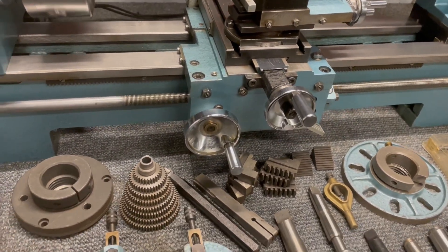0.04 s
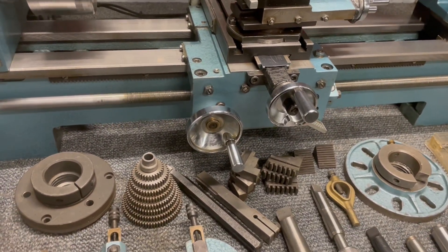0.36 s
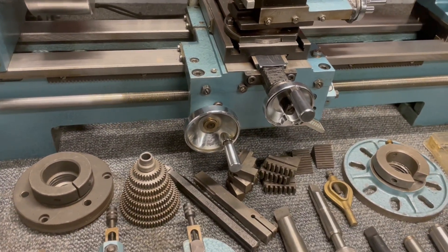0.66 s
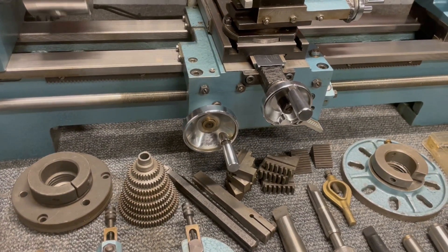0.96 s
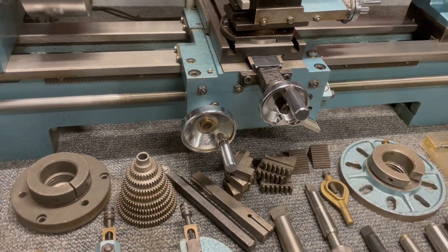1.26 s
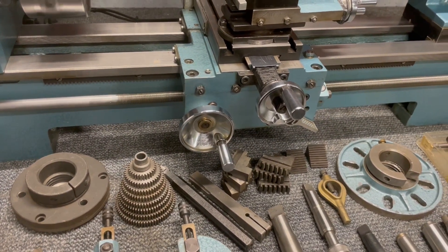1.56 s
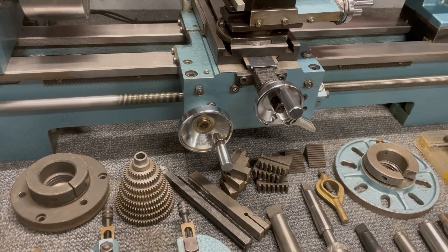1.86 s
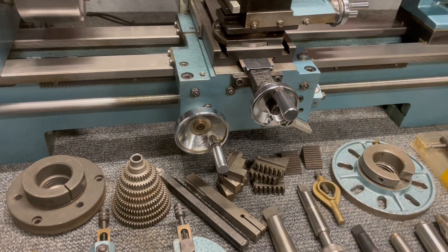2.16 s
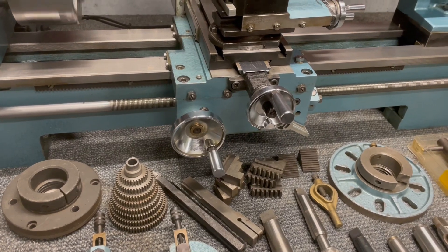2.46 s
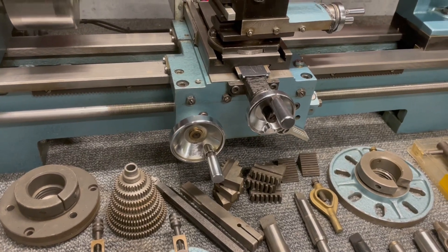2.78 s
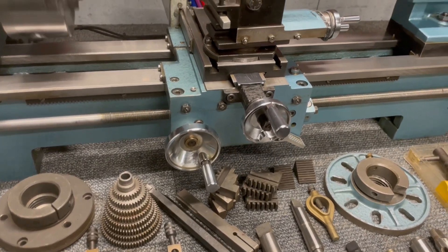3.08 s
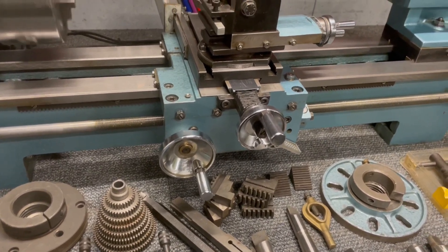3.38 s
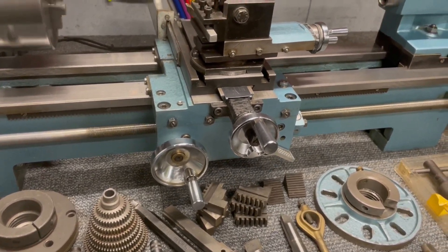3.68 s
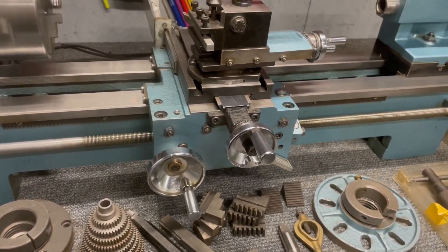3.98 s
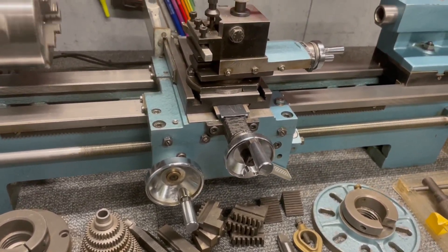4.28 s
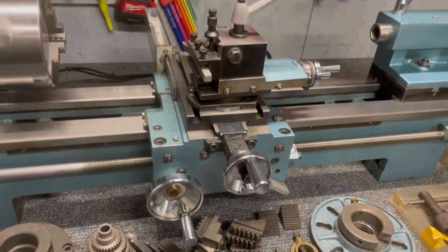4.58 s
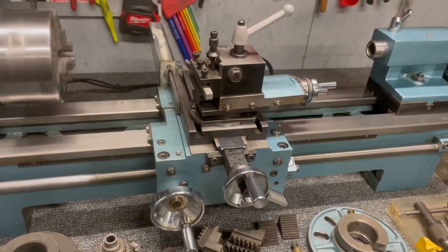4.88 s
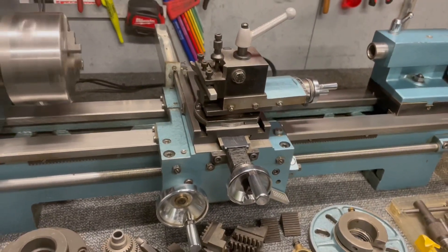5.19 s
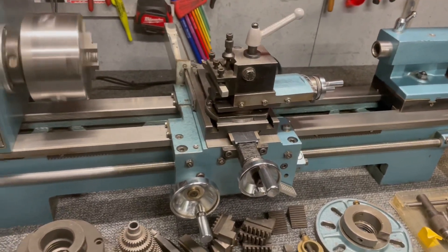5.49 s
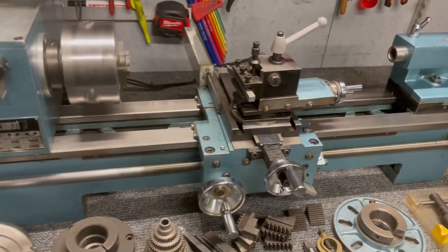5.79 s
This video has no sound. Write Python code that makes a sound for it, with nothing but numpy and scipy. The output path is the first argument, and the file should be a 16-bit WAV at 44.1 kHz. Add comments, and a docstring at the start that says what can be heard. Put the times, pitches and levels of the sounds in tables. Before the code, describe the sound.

A small metal lathe runs idle throughout in a workshop. Its motor hums while the gears give a fast, throbbing growl, a whine and a light rattle. Loose gear teeth knock irregularly, several times a second, over a faint belt hiss and a thin, high whistle. In the second half the bearings sing a little louder, with a few faint squeals near the end. The microphone is close and hand-held.

```python
"""A workshop, close to a small idling metal lathe; a hand-held microphone above the carriage turns
towards the chuck. Behind, the belt swishes, the drive electronics whistle thinly, the motor hums at
twice the mains rate and the bearings sing. In front, the headstock gears growl and whine, throb with
their shaft and ring the casting, now and then knocking through their backlash."""
import sys
import numpy as np
from scipy import signal
from scipy.fft import rfft, irfft
from scipy.io import wavfile

SR = 44100
rng = np.random.default_rng(int(sys.argv[2]) if len(sys.argv) > 2 else 0)


def inscribe(sig):
    """Save sig as 16-bit PCM at rate SR to the path in sys.argv[1].

    A 1-D sig is mono; a 2-D sig holds one channel per row.
    Samples are clipped to [-1, 1] before scaling.
    """
    pcm = np.round(np.clip(np.atleast_2d(sig).T, -1, 1) * 32767)
    wavfile.write(sys.argv[1], SR, pcm.astype(np.int16))


N = 257544

TIME = np.arange(N) / SR
FREQ = np.arange(N // 2 + 1) * SR / N + 1e-3
SIDES = np.array([[1], [-1]])  # left, right

RIPPLE_HZ, SHAFT_HZ = 99.965, 12.1935  # the motor's torque ripple, turns of the gear shaft
SPINDLE_HZ = SHAFT_HZ / 5
CHATTER_S = .005  # time over which a clash of teeth dies down

# Hum and gear tones. Each row: multiple of the spindle rate, multiple of the torque ripple (the two add
# up to the pitch), relative level in dB, left minus right in dB, left phase lead in radians.
TONES = [(0, 1, -31.9, -0.9, -0.2), (0, 2, -36.5, -2.6, -0.1), (0, 3, -46.5, -1.5, 0.2),
         (-5, 1, -53.1, -2.4, -0.1), (5, 2, -45.4, -4.2, 0.0), (108, 0, -48.5, -4.6, -0.3),
         (118, 0, -49, -3.3, -0.0), (134, 0, -47.8, -0.4, 0.6), (139, 0, -46.4, -4.6, 0.5),
         (144, 0, -45.0, -2.0, 0.4), (154, 0, -48.2, -3.8, 0.5), (170, 0, -48.0, -2.1, 1.0),
         (180, 0, -45.5, -4.7, -0.4), (185, 0, -47.9, -5.8, -0.1), (180, 1, -48.4, -6.1, 0.3),
         (280, 0, -47.5, 6.5, 1.8), (360, 0, -39.4, 3.5, 0.9), (355, 1, -49.3, -1.1, 0.7),
         (360, 1, -41.7, 11.3, 1.5), (365, 1, -48, 2.8, 1.7), (360, 2, -54.9, 5.1, 2.1),
         (497, 0, -52, 0, 1.5), (519, 0, -55, 0, 1.5), (540, 0, -53, 0, 1.5), (586, 0, -55, 0, 1.5),
         (620, 0, -53, 0, 1.5), (799, 0, -57.5, 0, 1.5), (555, 0, -51.1, -0.4, 1.6),
         (560, 0, -46.3, -1.4, 1.4), (560, 1, -54.5, 3.4, 0.0), (720, 0, -50.2, -0.3, 2.3),
         (840, 1, -56.6, -0.1, -1.1)]
# How the machine carries as the microphone moves. Each row: time in seconds, then rumble, mesh and
# rattle gains in dB.
CARRY = [(0, -.7, .3, -.5), (.8, .4, 0, -.2), (1.6, -.3, .2, -.5), (2.1, .1, -.2, -.7),
         (2.55, .9, -.5, -.9), (3.0, -.3, -.3, -.8), (3.8, 0, .1, .3), (4.5, -.2, 1, .9),
         (5.2, -1.5, 1.9, 1), (5.84, -1.6, 2.3, .5)]
# Hard backlash knocks. Each row: start in seconds, relative level in dB, rebound against the knock in dB.
KNOCKS = [(.011, -30.5, -10), (.262, -32, -12), (.411, -26, -7), (.510, -32.5, -10), (.911, -27.5, -7),
          (.991, -28, -4), (1.242, -31, -12), (1.650, -28, -10), (1.732, -29, -10), (1.812, -29.5, -12),
          (2.061, -28.5, -12), (2.142, -31, -12), (2.221, -27, -12), (2.442, -35, -1), (2.712, -27.5, -4),
          (2.791, -29.5, -12), (3.042, -29.5, -12), (3.372, -27, -12), (3.532, -26.5, -3),
          (3.861, -27, -12), (4.083, -33.5, -12), (4.103, -32, -12), (4.112, -27.5, -10), (4.191, -29, -8),
          (4.272, -24, -12), (4.443, -32, -10), (4.523, -29, -10), (4.601, -30.5, -6), (4.682, -25.7, -10),
          (4.936, -31, -10), (5.092, -25.5, -7), (5.413, -29.5, -10), (5.502, -26.5, -12)]


def undb(db):
    """Decibels to gain."""
    return 10 ** (np.asarray(db) / 20)


def curve(table, column=1):
    """One column of a time table at every sample."""
    table = np.array(table)
    return np.interp(TIME, table[:, 0], table[:, column])


def colour(table, column=1):
    """One column of a spectrum table at every frequency."""
    table = np.array(table)
    return np.interp(np.log(FREQ), np.log(table[:, 0]), table[:, column])


def wave(hz, peak_turns):
    """A cosine that peaks at the given share of its cycle."""
    return np.cos(2 * np.pi * (hz * TIME - peak_turns))


def walk(rate_hz):
    """Smooth random wander with a spread near 1."""
    count = int(N / SR * rate_hz) + 2
    knots = signal.resample(rng.standard_normal(count), 8 * count)
    return np.interp(TIME * rate_hz * 8, np.arange(len(knots)), knots / knots.std())


def above(hz):
    """Power response of a steep high-pass."""
    return 1 / (1 + (hz / FREQ) ** 6)


def resonance(hz, width):
    """Power response of a steep resonance."""
    return 1 / (1 + ((FREQ / hz - hz / FREQ) * hz / width) ** 2) ** 2


def room(t60):
    """Frequency response of the workshop's diffuse echoes, unit energy."""
    age = TIME[:SR // 2]
    tail = rng.standard_normal(len(age)) * undb(-60 * age / t60)
    return rfft(tail / np.linalg.norm(tail), N)


def ring(force, modes, spread):
    """Steel parts ring with a force; nearby surfaces scatter the sound differently to left and right."""
    gain = np.sqrt(sum(resonance(hz, width) * undb(db) ** 2 for hz, width, db in modes))
    paths = (1 + SIDES * spread * room(t60=.02)) / np.hypot(1, spread)
    return irfft(rfft(force) * paths * gain / np.sqrt(np.mean(gain ** 2)), N)


def placed_tone(phase, db, pan_db, lead=0):
    """A stereo tone, louder on the left by pan_db and ahead there by lead radians."""
    return np.sqrt(2) * undb(db + SIDES * pan_db / 2) * np.cos(phase + SIDES * lead / 2)


def belt(bounce=.4):
    """Hiss swells on each lap of the belt, bounces off the bed and reaches the two sides out of step."""
    # Belt and fan hiss. Each row: frequency in Hz, direct density in relative dB, left phase lead in
    # radians, scattered density in relative dB.
    belt_hiss = [(3500, -105, 1.5, -100), (4500, -95, 1.5, -85), (5300, -91, 1.5, -87),
                 (5750, -89, 3.2, -88), (6300, -83.5, 5.0, -86), (7000, -83.3, 5.0, -86),
                 (7600, -83, 3.5, -96), (8200, -82, 3.2, -104), (9000, -80, 2.7, -100),
                 (10000, -80, 2.1, -96), (11000, -82.7, 1.6, -100), (12000, -87.8, .9, -104),
                 (13000, -95.5, .2, -110), (15000, -118, 0, -128)]
    lap_hz = 9.24
    laps = wave(lap_hz, .8) + .5 * wave(2 * lap_hz, .3)
    swish = undb(1.3 * laps + .4 * wave(SHAFT_HZ, .31) + 1.3 * walk(29.73))
    direct = rfft(rng.standard_normal(N) * swish) * np.exp(1j * SIDES * colour(belt_hiss, column=2) / 2)
    near = direct * undb(colour(belt_hiss)) * (1 + bounce * room(t60=.06)) / np.hypot(1, bounce)
    scattered = rfft(rng.standard_normal((2, N)) * swish) * undb(colour(belt_hiss, column=3) - 1)
    return irfft(near + scattered, N) * np.sqrt(SR / 2) * undb(-1.1)


def whistle(switching_hz=15641.3):
    """The switching tone of the motor's drive electronics, trembling in level."""
    # Fades between standing waves. Each row: time in seconds, relative level in dB.
    whistle_fades = [(0.0, -63), (0.32, -60), (0.67, -77), (1.33, -58), (2.13, -64), (3.48, -54.5),
                     (3.82, -59), (4.77, -60), (4.85, -55), (5.41, -56), (5.53, -65), (5.61, -55),
                     (5.79, -68), (5.84, -56)]
    level = undb(curve(whistle_fades) + 4.5 + 1.3 * walk(35))
    phase = 2 * np.pi * switching_hz * TIME + .8 * walk(1.5)
    return np.sqrt(2) * level * np.cos(phase - SIDES * .38)


def motor_hum():
    """Steady magnetic hum at the torque ripple and its harmonics."""
    return sum(placed_tone(2 * np.pi * ripple * RIPPLE_HZ * TIME, db + .06, pan_db, lead)
               for spindle, ripple, db, pan_db, lead in TONES if spindle == 0)


def bearings():
    """Rolling balls keep the races ringing and a narrow gear whine rises towards the chuck, each mode swelling
    on its own; one race squeals in spurts."""
    # Narrow modes of races and thin covers, led by a narrow meshing whine near 1.37 kHz that grows # towards
    # the chuck. Each row: pitch in Hz, width in Hz, relative level in dB over the carriage, the # same towards
    # the chuck.
    race_modes = [(1367, 12, -56, -47), (1470, 200, -58, -45.5), (2350, 260, -53, -51),
                  (2660, 300, -54, -48), (2985, 90, -58, -48.5), (5023, 75, -69, -60),
                  (5146, 110, -62, -67), (5249, 55, -66, -61), (6272, 70, -72, -61.5),
                  (6590, 90, -70, -61.5), (6788, 50, -69, -62), (6990, 90, -62, -66)]
    # The microphone turns to the chuck. Each row: time in seconds, share of the turn from 0 to 1.
    microphone_turn = [(0, 0), (2.9, 0), (3.7, .6), (4.4, .95), (5.84, 1)]
    # Squeals, clearest near the chuck. Each row: centre in seconds, length in seconds, relative dB.
    squeals = [(5.03, .04, -54), (5.14, .04, -53), (5.435, .06, -47.5), (5.545, .035, -51.5),
               (5.585, .025, -54), (5.638, .045, -51), (5.77, .04, -51.5)]
    singing, turn = 0, curve(microphone_turn)
    for hz, width, carriage_db, chuck_db in race_modes:
        level = (1 - turn) * undb(carriage_db) + turn * undb(chuck_db)
        swell = undb(2.5 * walk(7) - 1)
        singing += level * swell * ring(rng.standard_normal(N), [(hz, width, 0)], spread=.55)
    spurts = sum(undb(db) * np.exp(-2 * ((TIME - at) / length) ** 2) for at, length, db in squeals)
    squeal = ring(rng.standard_normal(N) * spurts, [(5060, 130, 0)], spread=.4)
    return (singing + squeal) * undb(SIDES * .8)  # a little to the left


def tooth_load():
    """Load on the teeth in dB: a throb on each turn of the shaft, some deep, some shallow."""
    # One throb. Each row: share of the shaft turn, typical load in dB.
    load_cycle = [(0, -1), (.12, 2.4), (.28, 0), (.45, .3), (.7, -2.3)]
    return np.interp(SHAFT_HZ * TIME, *np.transpose(load_cycle), period=1) * (1 + .3 * walk(12))


def gear_tones(load_db, whine_above_hz=600):
    """Meshing teeth sound low tones that heave with the load and a fluttering whine above them."""
    # The whine flutters more near the chuck. Each row: time in seconds, depth in dB.
    whine_flutter = [(0, .6), (3.8, .6), (4.4, 1.3), (5.84, 1.3)]
    heave_db = curve(CARRY) + load_db + .5 * wave(SPINDLE_HZ, .089) + .66
    out = 0
    for spindle, ripple, db, pan_db, lead in TONES:
        if spindle != 0:
            hz = spindle * SPINDLE_HZ + ripple * RIPPLE_HZ
            phase = 2 * np.pi * (hz * TIME + rng.uniform()) + .071 * walk(4.88)
            waver_db = walk(2.17)
            motion_db = heave_db if hz < whine_above_hz else curve(whine_flutter) * walk(22) + .06
            out += placed_tone(phase, db + waver_db + motion_db, pan_db, lead)
    return out


def growl(hz, level_db, pan_db):
    """A low tone of the headstock, its pitch never quite steady."""
    phase = 2 * np.pi * (hz * TIME + rng.uniform()) + .9 * walk(14)
    return placed_tone(phase, level_db, pan_db)


def headstock_growls(load_db):
    """Two low tones come and go and throb with the tooth load."""
    # The swells of each tone. Each row: time in seconds, relative level in dB.
    upper_swells = [(0.0, -47), (0.14, -34), (0.36, -47), (0.42, -38), (0.69, -34), (0.78, -40),
                    (0.84, -36), (1.02, -37), (1.13, -47), (1.28, -47), (1.33, -39), (1.41, -37),
                    (1.49, -44), (1.74, -34), (1.9, -37), (1.97, -42), (2.09, -34), (2.48, -40),
                    (2.66, -32), (2.76, -36), (2.82, -47), (2.96, -38), (3.19, -41), (3.47, -33),
                    (3.67, -44), (3.74, -39), (3.98, -35), (4.06, -39), (4.22, -34), (4.53, -45),
                    (4.58, -37), (4.7, -35), (4.92, -47), (5.05, -39), (5.35, -46), (5.4, -38), (5.52, -35),
                    (5.83, -47)]
    lower_swells = [(0.0, -36), (0.16, -38), (0.23, -47), (0.53, -36), (0.7, -41), (0.78, -35), (0.95, -37),
                    (1.04, -46), (1.15, -47), (1.23, -35), (1.27, -34), (1.46, -45), (1.59, -38),
                    (1.79, -46), (2.02, -35), (2.26, -44), (2.39, -34), (2.56, -33), (2.86, -47),
                    (2.93, -38), (3.01, -38), (3.08, -44), (3.24, -36), (3.59, -45), (3.67, -37),
                    (3.77, -35), (3.95, -39), (4.09, -38), (4.2, -47), (4.29, -39), (4.37, -47), (4.5, -40),
                    (4.62, -47), (4.7, -40), (5.07, -36), (5.16, -47), (5.56, -47), (5.83, -38)]
    throb_db = 1.4 * load_db
    upper = growl(hz=275, level_db=curve(upper_swells) + throb_db + 1.04, pan_db=-5)
    lower = growl(hz=248, level_db=curve(lower_swells) + throb_db, pan_db=-3.5)
    return upper + lower


def strike_time(turn, slack_turns=.08, strike_cycles=.06):
    """Once a shaft turn the teeth go slack; the nearest push of the torque ripple slaps them together."""
    return (round((turn + slack_turns) / SHAFT_HZ * RIPPLE_HZ) + strike_cycles) / RIPPLE_HZ


def clack(count=14, gap_s=.0008, peak_s=.003, settle_s=.014):
    """One clash of teeth: a quick run of sharp metal contacts, then a faint settling rattle."""
    age = TIME[:SR // 10]
    gaps = gap_s * rng.uniform(.4, 1.6, count)
    at = np.cumsum(gaps) - gaps[0]
    strength = np.exp(-((at - peak_s) / CHATTER_S) ** 2)
    contacts = np.zeros(len(age))
    contacts[(at * SR).astype(int)] = rng.choice([-1, 1], count) * strength
    settling = .38 * np.exp(-age / settle_s) * rng.standard_normal(len(age))
    return contacts * np.sqrt(SR * CHATTER_S) / np.linalg.norm(contacts) + settling


def backlash():
    """Loose teeth knock on some shaft turns, only tick on the rest, and rebound two ripple cycles on."""
    # Modes of the struck gears. Each row: pitch in Hz, width in Hz, relative level in dB.
    gear_modes = [(800, 500, 0), (1450, 800, 1), (2170, 300, 1.5), (2800, 750, -1), (3800, 800, -7.5),
                  (5200, 2500, -23)]
    hard_turns = [round(start * SHAFT_HZ) for start, _, _ in KNOCKS]
    tick_db = rng.normal(-39, 1.5, int(N / SR * SHAFT_HZ))
    ticks = [(strike_time(turn), db, -10) for turn, db in enumerate(tick_db) if turn not in hard_turns]
    force = np.zeros(N + SR)
    for start, db, rebound_db in KNOCKS + ticks:
        for late_s, softer_db in (0, 0), (2 / RIPPLE_HZ, rebound_db):
            onset, clash = int((start + late_s) * SR), clack()
            force[onset:onset + len(clash)] += undb(db + softer_db - .9) * clash
    return ring(force[:N], gear_modes, spread=.63)


def thuds(pan_db=-3):
    """Each hard knock shakes the headstock: a low ring builds up and dies away."""
    # Low headstock modes. Each row: pitch in Hz, seconds to fall 60 dB, level against the knock in dB.
    thud_modes = [(272, .13, 0), (350, .11, -2)]
    out, age = np.zeros(N + SR), TIME[:SR // 5]
    build_up = 1 - np.exp(-age / CHATTER_S)
    for start, db, _ in KNOCKS:
        onset = int(start * SR)
        for hz, t60, mode_db in thud_modes:
            level = build_up * undb(db + mode_db - 60 * age / t60)
            out[onset:onset + len(age)] += level * np.sin(2 * np.pi * (hz * age + rng.uniform()))
    return out[:N] * undb(SIDES * pan_db / 2)


def teeth(press_db, repeat, ripple_db, ripple_turns):
    """Spectrum of tooth roughness: the same flanks meet each spindle turn, chopped by torque ripple."""
    flanks = np.resize(rng.standard_normal(round(SR / SPINDLE_HZ)), N)
    grit = np.sqrt(repeat) * flanks + np.sqrt(1 - repeat) * rng.standard_normal(N)
    force = grit * undb(press_db + ripple_db * wave(RIPPLE_HZ, ripple_turns))
    return rfft(force / force.std())


def casting(force_spectrum, t60=.2):
    """The casting rings with the force; workshop echoes spread it between left and right."""
    # Resonances of headstock, bed and covers. Each row: pitch in Hz, width in Hz, then mid and side
    # densities in dB.
    casting_modes = [(59, 69, -74.5, -85.0), (122, 57, -63.6, -76.5), (189, 49, -66, -77.1),
                     (241, 40, -57, -68.5), (275, 30, -58.5, -66.5), (345, 42, -57.5, -67),
                     (375, 20, -58, -67), (412, 24, -58, -65), (455, 100, -63, -69.5),
                     (568, 139, -60.4, -68), (665, 46, -63.9, -64), (790, 200, -60.7, -62),
                     (1015, 150, -63.9, -61.3), (1230, 97, -66.6, -66.5), (1371, 120, -64.5, -63.5),
                     (1510, 90, -64, -63), (1620, 90, -67, -61.5), (1730, 120, -66.5, -60),
                     (1900, 170, -84, -70.5), (2050, 160, -72.5, -73), (2175, 190, -69.3, -69.3),
                     (2642, 660, -70.8, -75.5), (2983, 754, -78.5, -75.5), (3600, 1700, -80.8, -84.5),
                     (5096, 741, -82, -83.7)]
    # Where the casting radiates. Each row: frequency in Hz, left minus right in dB.
    radiation = [(110, -1), (250, -3), (400, -3), (560, 3), (900, .5), (1300, 1.5), (2400, .5), (4400, 3),
                 (8000, 0)]
    mid_power = sum(resonance(hz, width) * undb(db) ** 2 for hz, width, db, _ in casting_modes)
    side_power = sum(resonance(hz, width) * undb(db) ** 2 for hz, width, _, db in casting_modes)
    ringing = .15 + .5 * above(1200)  # thin covers add a thicket of narrow resonances in the treble
    mid = np.sqrt(mid_power) * (1 + ringing * room(t60)) / np.hypot(1, ringing)
    side = np.sqrt(side_power) * room(t60)
    paths = (mid + SIDES * side) * undb(SIDES * colour(radiation) / 2)
    return irfft(force_spectrum * paths, N) * np.sqrt(SR / 2)


def headstock(load_db):
    """Rough teeth drive the casting: heavy rumble, an even meshing rush and a light rattle on top."""
    swell = wave(SPINDLE_HZ, .27)  # once a spindle turn
    rumble_db = curve(CARRY, column=1) + 1.3 * load_db + swell
    rumble = teeth(rumble_db, repeat=.3, ripple_db=1, ripple_turns=.07)
    mesh_db = curve(CARRY, column=2) + .3 * load_db + .5 * swell
    mesh = teeth(mesh_db, repeat=.68, ripple_db=2.8, ripple_turns=.28)
    rattle_db = curve(CARRY, column=3) + .6 * load_db + .8 * swell + walk(70)
    rattle = teeth(rattle_db, repeat=.55, ripple_db=.8, ripple_turns=.35)
    over_bass, treble = above(750), above(1520)
    return casting(rumble * np.sqrt(1 - over_bass)
                   + undb(-.13) * mesh * np.sqrt(over_bass * (1 - treble))
                   + undb(-1.26) * rattle * np.sqrt(treble))


def scene():
    """The whole lathe at the microphone; one tooth load makes rumble, growls and gear tones throb."""
    load_db = tooth_load()
    running = headstock(load_db) + bearings()
    knocks = backlash() + thuds()
    gears = headstock_growls(load_db) + gear_tones(load_db)
    drive = motor_hum() + whistle() + belt()
    return running + knocks + gears + drive


def record(dry, top_hz=15900):
    """The recorder cuts the very top with a steep low-pass."""
    return signal.sosfilt(signal.ellip(10, .1, 80, top_hz, fs=SR, output="sos"), dry)


dry = scene()
out = record(dry)
inscribe(out)
```